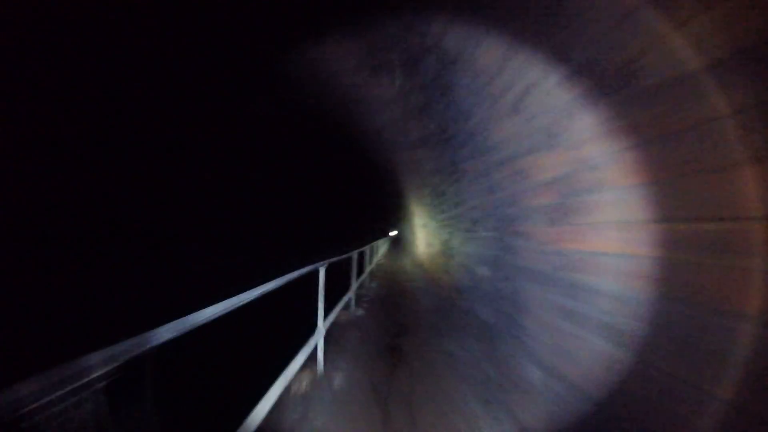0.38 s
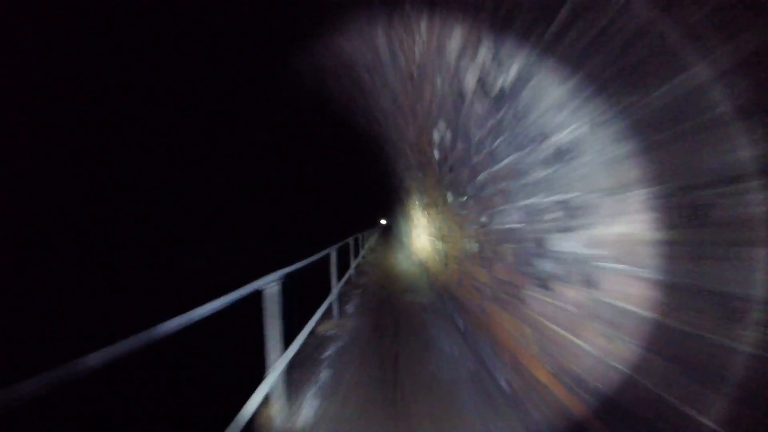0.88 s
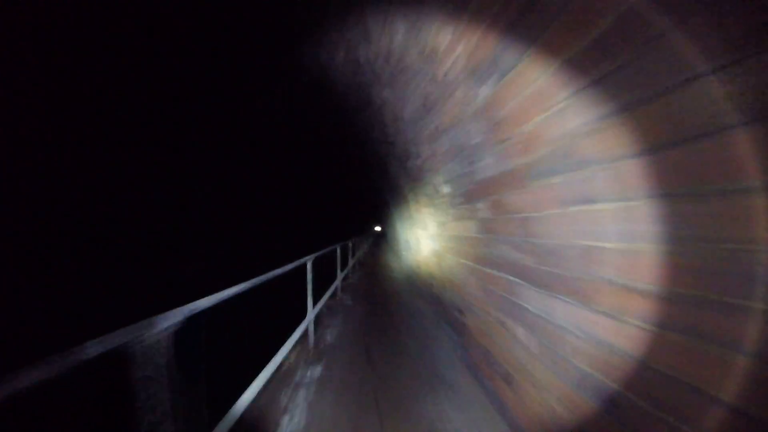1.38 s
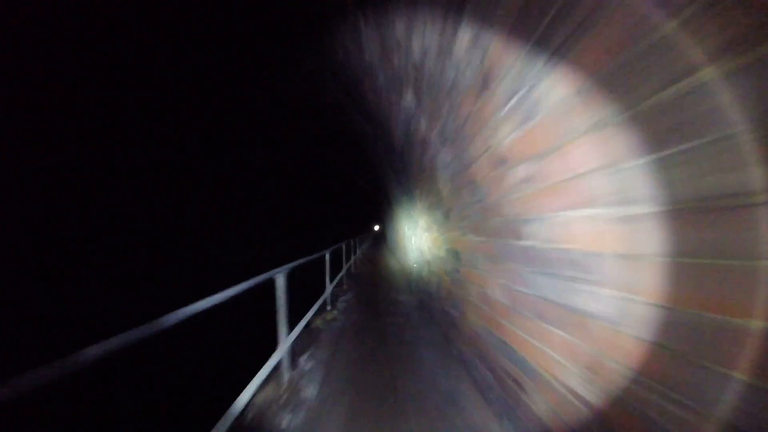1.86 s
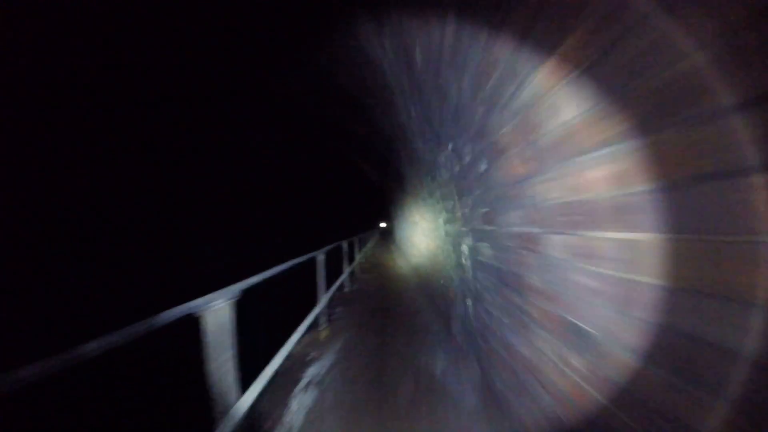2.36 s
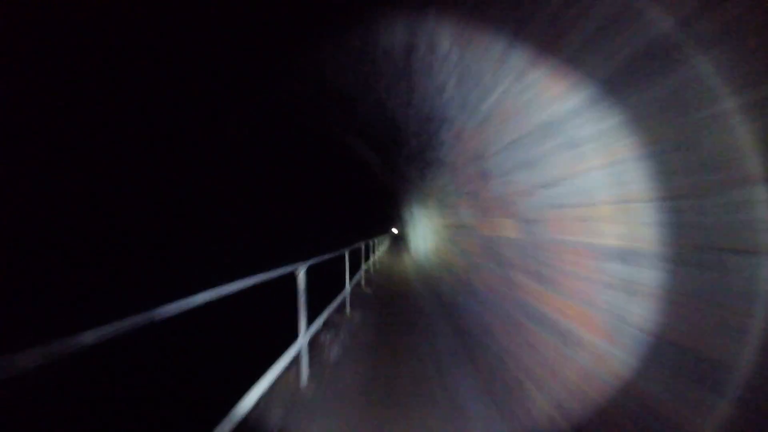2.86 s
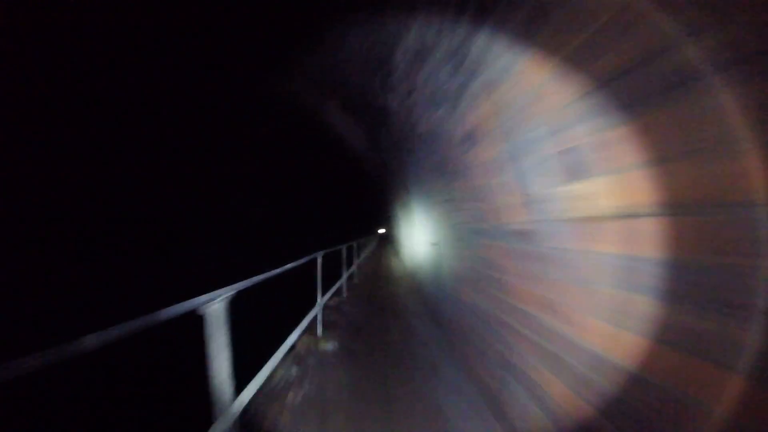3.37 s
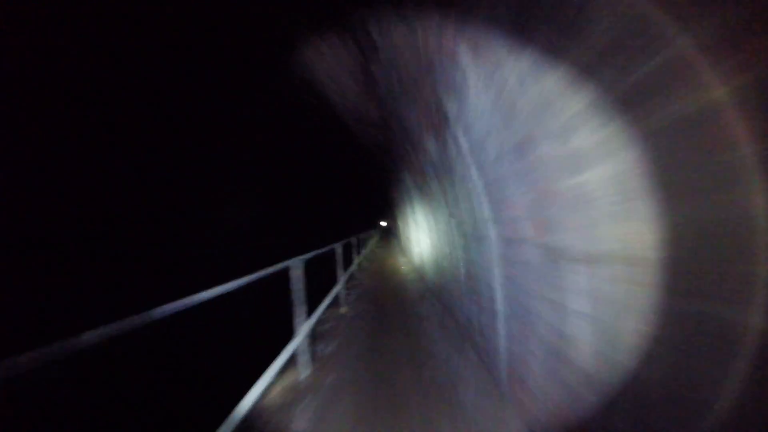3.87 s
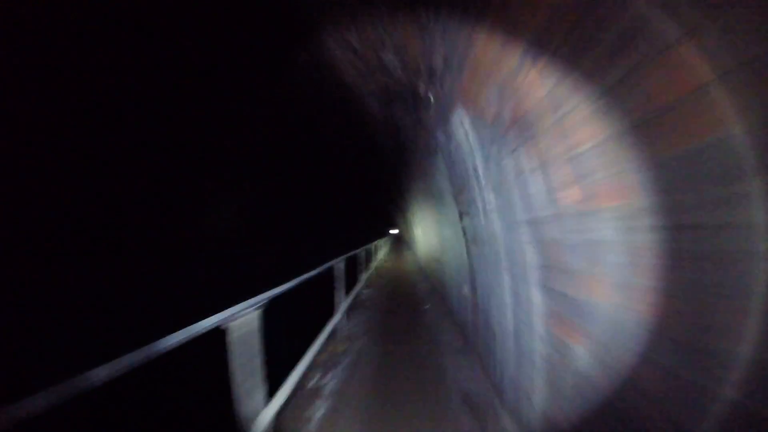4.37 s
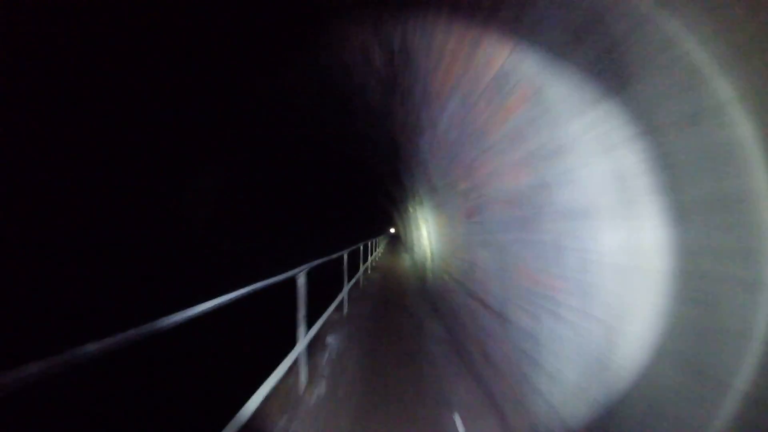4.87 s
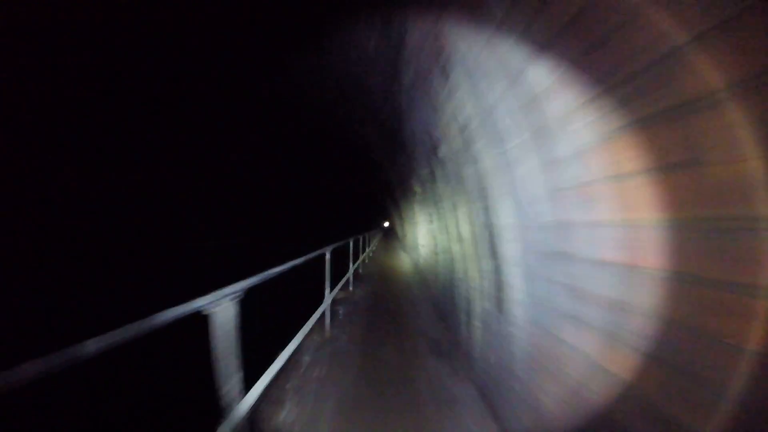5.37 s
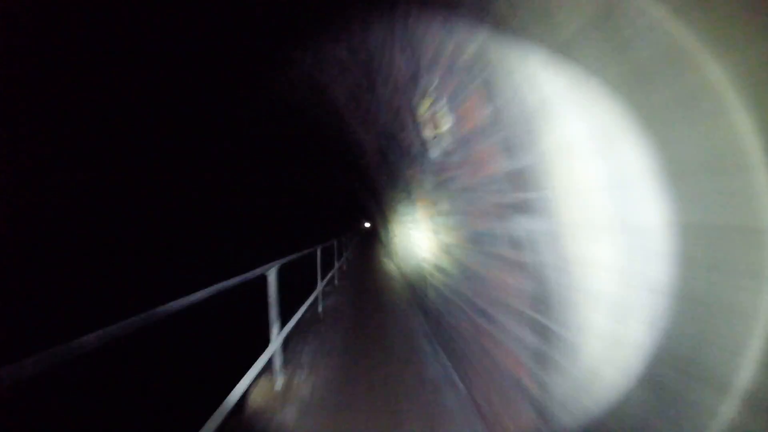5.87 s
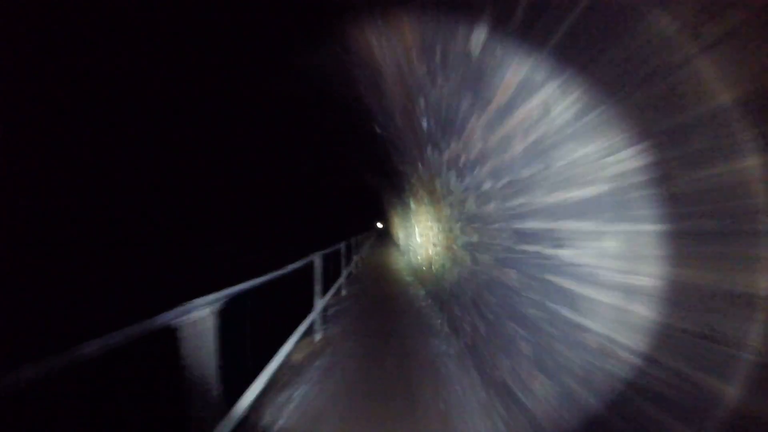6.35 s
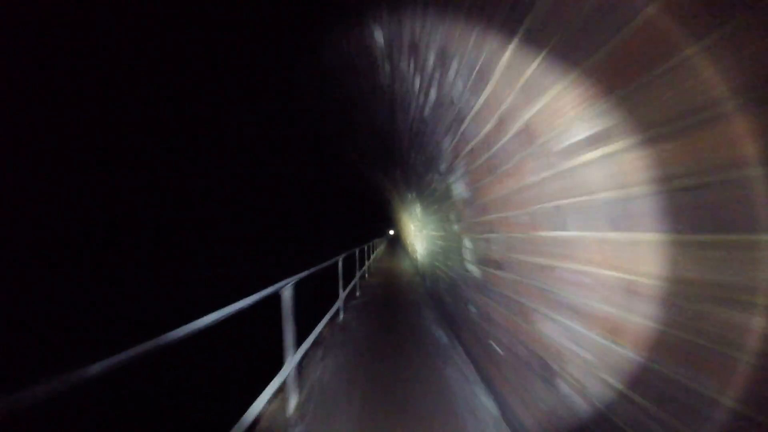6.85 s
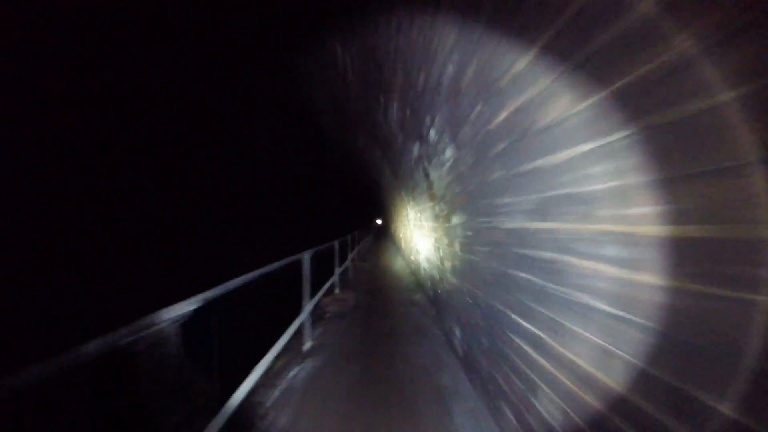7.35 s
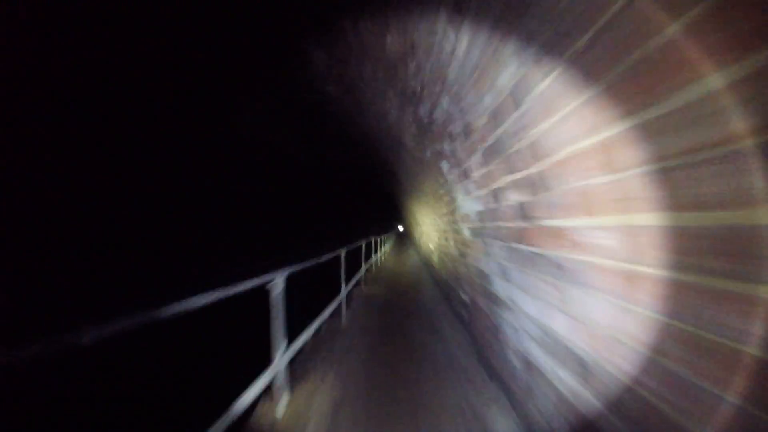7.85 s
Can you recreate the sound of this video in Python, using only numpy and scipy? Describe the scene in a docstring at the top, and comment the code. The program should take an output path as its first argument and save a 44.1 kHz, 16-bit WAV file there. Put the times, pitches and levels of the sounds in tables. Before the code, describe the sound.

A bicycle rolls fast along a rough tunnel path, its frame booming deeply, air buffeting the mounted microphone, loose parts knocking and a faint chain whirr.

```python
"""A bicycle's frame and microphone mount boom near 100 Hz on a rough path: coloured noise, an unsteady
hum and a short decaying sine at every bump. Air buffets the microphone as gusts of low noise.
Loose parts knock as short ringing modes, and the tyres rumble as flickering filtered noise.
The chain whirrs in bursts of resonant noise, and now and then the signal snaps by a sudden step."""
import sys
import numpy as np
from scipy import signal
from scipy.fft import rfft, irfft, next_fast_len
from scipy.io import wavfile
from scipy.ndimage import map_coordinates

SR = 44100
rng = np.random.default_rng(int(sys.argv[2]) if len(sys.argv) > 2 else 0)


def linear_from_db(decibels):
    """Turn decibels (scalar or array-like) into linear amplitude factors; 0 gives 1."""
    return 10 ** (np.asarray(decibels, float) / 20)


def dump_mix(stems):
    """Bounce the given channels to the path in sys.argv[1] as a 16-bit WAV at rate SR."""
    frames = np.atleast_2d(stems).T  # one column per channel
    limited = np.clip(frames, -1, 1)  # hard clip at full scale
    pcm = np.round(limited * 32767).astype(np.int16)
    wavfile.write(sys.argv[1], SR, pcm)


N = 362943

# the path surface: t/s, unevenness as relative frame boom level/dB, grit as relative tyre rumble level/dB
PATH = [(0.0, -23.5, -46.5), (0.48, -22.5, -47.5), (0.92, -27, -48), (1.28, -25, -43), (2.34, -23.5, -43),
        (2.96, -26, -47), (3.37, -26, -45.5), (4.06, -25, -43.5), (4.24, -22, -44), (4.47, -26, -42.5),
        (5.27, -23.5, -41.5), (5.71, -29, -45), (6.53, -23, -43), (7.08, -23, -42.5), (7.47, -28.5, -45),
        (8.23, -24, -48)]


def unit(x):
    """x at rms 1."""
    return x / np.sqrt(np.mean(x ** 2) + 1e-20)


def curves(rows):
    """One value per sample for each column after the time."""
    s, *cols = np.transpose(rows)
    return [np.interp(np.arange(N) / SR, s, c) for c in cols]


def wobble(rate):
    """A smooth random curve, rate knots a second."""
    knots = rng.standard_normal(int(N * rate / SR) + 4)
    return map_coordinates(knots, [np.arange(N) * rate / SR])


def swells(rows, half_s):
    """A bell-shaped change in dB for each (s, dB) row, down to 1/e at half_s from its middle."""
    t = np.arange(N) / SR
    return sum(db * np.exp(-((t - s) / half_s) ** 2) for s, db in rows)


def filtered(x, response):
    """x times a complex response of frequency."""
    m = next_fast_len(N + SR // 2)
    return irfft(rfft(x, m) * response(np.fft.rfftfreq(m, 1 / SR)), m)[:N]


def resonance(f, centre, width):
    """Response at f of two equal band-pass resonators in series, all in Hz."""
    return (1j * f * width / (centre ** 2 - f * f + 1j * f * width)) ** 2


def coloured(x, spectrum):
    """x with the colour of (Hz, dB) points, at rms 1."""
    hz, db = np.transpose(spectrum)
    return unit(filtered(x, lambda f: linear_from_db(np.interp(np.log(f + 1), np.log(hz + 1), db))))


def gritty(grit_db, rate):
    """White noise whose level flickers: dense uneven contacts."""
    return linear_from_db(grit_db * wobble(rate)) * rng.standard_normal(N)


def steadied(x, share):
    """x with part of its own random swelling taken out."""
    envelope = np.abs(signal.hilbert(x, next_fast_len(N))[:N])
    return unit(x / (envelope + 0.79) ** share)


def add(track, s, sound):
    """Mixes a short sound in at a time."""
    part = track[round(s * SR):][:len(sound)]
    part += sound[:len(part)]


def snaps():
    """A jump within one sample sinks back in a few milliseconds, then is smoothed; faint ones are random."""
    # sudden steps of the signal: t/s, signed height before smoothing
    steps = [(.255, .004), (0.4792, .016), (2.0475, -.03), (2.391, .006), (2.3994, .09), (2.9434, .15),
             (3.006, .012), (3.382, .01), (5.4394, 0.19), (5.4798, 0.02), (5.553, .012), (6.6234, .045),
             (7.2954, -.14), (7.3279, 0.026), (7.34, .004), (7.672, .008), (7.6794, .07), (7.703, .01),
             (7.872, .004), (8.159, 0.008)]
    faint_count, faint_height = 40, .002  # mean height
    out = np.zeros(N)
    t = np.arange(SR // 20) / SR
    when, size, sign = rng.random((faint_count, 3)).T
    faint_heights = -faint_height * np.log(1 - size) * np.sign(sign - .5)
    faint = np.c_[when * (N / SR - .1), faint_heights]
    for s, height in np.r_[steps, faint]:
        add(out, s, height * np.exp(-t / .004))
    return filtered(out, lambda hz: 1 / (1 + 1j * hz / 9000) ** 2 / np.sqrt(1 + (hz / 11500) ** 8))


def effort():
    """Whirr gain: each stroke takes the load fast, sags and lets go, over the free-running chain."""
    # pedal strokes load the chain: start t/s, length/s, relative whirr level/dB
    strokes = [(1.291, 0.27, -56.5), (1.716, 0.29, -58.5), (2.102, .295, -61), (2.633, 0.16, -62.5),
               (2.86, 0.053, -68.5), (2.998, 0.07, -67.5), (3.384, 0.083, -69.5), (3.809, 0.36, -65),
               (4.164, 0.19, -68), (4.565, 0.24, -68), (4.81, 0.5, -65), (5.324, 0.081, -65),
               (5.734, 0.31, -76), (6.111, 0.076, -68), (6.284, 0.35, -74.5), (6.551, 0.41, -67),
               (6.92, .45, -70.5)]
    coast_db, spin_db = -75.5, -70.5  # relative whirr level when coasting, and between strokes
    pedalling_from_s, pedalling_to_s = 1.285, 6.8
    pull_s, slack_s, sag_db_per_s = 0.0088, .035, 12  # taking the load, letting go, fading effort
    t = np.arange(N) / SR
    pedalling = (t > pedalling_from_s) & (t < pedalling_to_s)
    gain = linear_from_db(np.where(pedalling, spin_db, coast_db))
    for s, length, db in strokes:
        since = np.maximum(t - s, 0)
        pull = 1 - np.exp(-since / pull_s)
        release = np.exp(-np.maximum(since - length, 0) / slack_s)
        gain = np.hypot(gain, pull * release * linear_from_db(db - sag_db_per_s * since))
    return gain * linear_from_db(.7 * wobble(12))


def chain():
    """Links and teeth rub into metal resonances that wax and wane, narrow ones most, over a faint hiss."""
    # chain and sprocket resonances: centre f/Hz, width/Hz, relative level/dB
    metal = [(962, 150, 3.5), (1335, 240, -4), (1654, 520, -13), (1990, 150, -6), (2230, 230, -6),
             (2960, 240, -20), (3680, 330, -22), (4850, 400, -18), (5250, 250, -18), (5740, 170, -14),
             (6430, 170, -16), (5960, 4900, -21), (8800, 1200, -34.5)]
    # colour of the hiss: f/Hz, level/dB
    hiss_colour = [(1500, -29), (2500, -6.5), (4000, -10), (6000, -7), (6450, 0), (6900, -8), (8600, -10.5),
                   (10300, -22), (13000, -48.5), (16000, -120)]
    flicker_db, wane_db, wane_rate = 1.2, 2.8, 18  # rate in knots a second
    whirr = np.zeros(N)
    for centre, width, db in metal:
        wane = wane_db * min(1, (250 / width) ** .5) * wobble(wane_rate)
        rubbing = gritty(flicker_db, rate=160)
        whirr += linear_from_db(db + wane) * filtered(rubbing, lambda f: resonance(f, centre, width))
    hiss = coloured(gritty(grit_db=2.0, rate=130), hiss_colour)
    hiss_db = -70.5 + 1.1 * wobble(4.1)
    return linear_from_db(8.5) * effort() * unit(whirr) + linear_from_db(hiss_db) * hiss


def tyres():
    """Tread on grit: a lumpy rumble of noise that flickers quickly and follows the path."""
    # colour of the rumble: f/Hz, level/dB
    tyre_colour = [(110, -27), (180, 0.5), (233, -4), (387, -21.5), (446, -13.5), (549, -16), (1050, -26),
                   (1740, -56), (2260, -53), (2640, -77), (4000, -83.5), (5200, -84.5), (8800, -120)]
    rumble_db = curves(PATH)[1] + 1.5 + 1.1 * wobble(13)
    return linear_from_db(rumble_db) * coloured(gritty(grit_db=2.5, rate=90), tyre_colour)


def knocks():
    """Loose parts strike and rebound: casing modes ring under a bright edge and a dull after-rattle."""
    # knocks of loose parts: t/s, relative level/dB, edge level/dB relative to the knock
    strikes = [(0.024, -34, -13), (0.052, -31.5, -19), (0.107, -36.5, -13), (0.177, -32.5, -18),
               (0.235, -32.5, -16.5), (0.288, -37.5, -27), (0.322, -31, -21.5), (0.414, -40, -24),
               (0.459, -36, -20), (0.655, -39, -19), (0.668, -38.5, -22), (0.694, -30.5, -32),
               (0.711, -30.5, -21), (0.747, -25.5, -44), (0.76, -31, -11), (0.82, -32, -19.5),
               (0.891, -37.5, -21), (1.137, -30, -22), (1.216, -27, -21), (1.23, -31.5, -33),
               (1.275, -36, -21), (1.288, -30.5, -20.5), (1.364, -34, -16), (1.384, -32.5, 1.5),
               (1.454, -35.5, -9), (1.472, -34.5, -22), (1.525, -26.5, -27), (1.539, -30.5, -29),
               (1.702, -33.5, -20.5), (1.739, -34.5, -0.5), (1.762, -34.5, -9), (2.467, -31, -28),
               (2.489, -35, -28), (2.784, -32.5, -13), (2.8, -34, -37), (3.048, -29.5, -10),
               (3.193, -37.5, -17), (3.336, -27.5, -14), (3.671, -30.5, -26.5), (3.829, -33.5, -1.5),
               (3.925, -33, -19), (4.155, -33, -24), (4.191, -23.5, -36), (4.207, -30.5, -14.5),
               (4.248, -31, -15), (4.425, -31, -15.5), (4.487, -33, -11), (4.592, -37.5, -4.5),
               (4.604, -36, -24.5), (4.65, -37, -24.5), (5.322, -32, -30), (5.484, -27.5, -21),
               (5.493, -32, -25), (5.556, -32.5, -9), (5.702, -27.5, -27), (5.75, -35, -13),
               (5.889, -34, -19.5), (5.951, -36.5, -10), (6.008, -33, -21.5), (6.051, -30.5, -29),
               (6.065, -27.5, -31), (6.13, -31.5, -39), (6.16, -40, -6), (6.405, -34, -11.5),
               (6.471, -29.5, -25), (7.055, -36.5, -30.5), (7.092, -40, -14), (7.175, -25.5, -17),
               (7.186, -29, -16), (7.352, -27.5, -26.5), (7.413, -30, -11), (7.566, -26, -17),
               (7.59, -36, -25), (7.621, -30, -19), (7.705, -29, -19), (7.713, -31.5, -17),
               (7.724, -34, -12), (7.769, -30, -27), (7.833, -34.5, -32), (7.928, -31, -15),
               (7.938, -35, -11), (7.958, -34.5, -18), (8.0, -38, -27), (8.014, -25, -39),
               (8.075, -34, -28), (8.146, -27, -14), (8.159, -34, -33), (8.218, -26, -11)]
    # modes of the microphone casing: f/Hz, level/dB, t60/s
    casing = [(389, -8, 0.063), (575, -1.5, 0.022), (707, 4, 0.015), (906, 2, 0.018), (1071, -3, 0.029),
              (1490, -20.5, 0.0096)]
    # small random knocks: 60 clumps of 3
    small = rng.random((60, 3, 2))
    clump_s = small[:, :1, 0] * (N / SR - .2) + 0.082 * small[:, :, 1]
    small_db = -49 + 9 * rng.random(clump_s.size)
    extra = np.c_[clump_s.ravel(), small_db, np.full(clump_s.size, -22)]
    # each listed part strikes back once
    rebound_s, rebound_loss_db = .011, 8  # mean flight, mean loss
    flight, loss = rng.random((len(strikes), 2)).T + .5
    rebounds = strikes + np.c_[rebound_s * flight, -rebound_loss_db * loss, 3 * loss]
    rows = np.r_[strikes, rebounds, extra]

    hz, mode_db, t60 = np.transpose(casing)[:, :, None]
    t = np.arange(SR // 20) / SR
    onset = 1 - np.exp(-t / 0.00077)
    body, edges, rattle = np.zeros((3, N))
    for s, db, edge_db in rows:
        # every knock excites and detunes the modes anew
        louder, detune = rng.standard_normal((2, len(casing), 1))
        noise = rng.standard_normal(len(t))
        ring_level = linear_from_db(db - 5.5 + mode_db + 3.3 * louder - 60 * t / t60)
        rings = ring_level * np.sin(2 * np.pi * hz * (1 + 0.049 * detune) * t)
        add(body, s, rings.sum(axis=0) * onset)
        add(edges, s, noise * linear_from_db(db + edge_db - 1.0 - 60 * t / 0.0093))
        add(rattle, s, noise[::-1] * linear_from_db(db - 1.5 - 60 * t / .05))
    bright = filtered(edges, lambda f: resonance(f, 2300, 2800))
    dull = filtered(rattle, lambda f: resonance(f, 750, 900) / (1 + 1j * f / 1400) ** 2)
    return body + bright + dull


def air():
    """Turbulence on the microphone port: low noise in gusts, a little stronger where the path is uneven."""
    # gusts: t/s, level/dB over the steady air stream
    port_gusts = [(.04, 6.5), (.42, 7), (.67, 8.5), (.86, 4), (1.14, 4), (1.5, 6), (2.1, 4.5), (2.33, 7),
                  (2.46, 14.5), (2.66, 7), (2.84, 10.5), (3.0, 2), (3.23, 11.5), (4.0, 10.5), (4.19, 6),
                  (4.89, 13.5), (5.03, 7.5), (5.29, 3.5), (5.48, 3.5), (5.69, 4.5), (5.93, 7.5),
                  (6.11, 4.5), (6.7, 9.5), (6.88, 4.5), (7.16, 11), (7.35, 7.5), (7.6, 9.5), (7.77, 6),
                  (8.0, 5.5), (8.17, 11)]
    # colour of the turbulence: f/Hz, level/dB
    air_colour = [(4.7, -6.5), (8.0, -6), (54, -2), (85, -8), (110, -22), (190, -120)]
    stream_db, gust_s = -25, .04  # steady air stream; half length of a gust
    shake_db = .3 * (curves(PATH)[0] + 24)
    buffet_db = stream_db + shake_db + swells(port_gusts, gust_s) + 1.5 * wobble(3.5)
    turbulence = coloured(rng.standard_normal(N), air_colour)
    return linear_from_db(buffet_db) * steadied(turbulence, share=0.48)


def frame():
    """Road texture keeps the mount humming amid a broad boom; each bump kicks it into a few cycles."""
    # bumps in the path: t/s, level/dB before onset and decay, ring f/Hz
    path_bumps = [(0.219, 2, 96.3), (0.655, -2, 85), (0.997, -4.5, 95.5), (1.12, -1, 97.5),
                  (1.346, -11, 80.7), (1.827, -3, 97.5), (2.067, 2, 104.7), (2.146, 1, 104),
                  (2.229, -7, 98), (2.325, -1, 83), (2.524, 1, 89.3), (2.644, 1.5, 101.5),
                  (2.79, 0.5, 94.7), (2.9, 1, 79), (2.996, 3.5, 101), (3.2, -0.5, 96.3),
                  (3.247, -7.5, 82.6), (4.04, 2.5, 101), (4.214, 4, 98), (4.861, -2, 97.2),
                  (4.984, -2.5, 100), (5.232, -10, 93.5), (5.285, 3, 87.8), (5.466, 0.5, 90.4),
                  (5.654, -1, 81), (5.699, 0.5, 104.3), (5.799, -3.5, 81.4), (5.891, -9.5, 72),
                  (6.673, -0.5, 99), (6.876, 3, 94.4), (7.124, -4.5, 109.4), (7.32, -4, 75.4),
                  (7.696, -5.5, 85.3)]
    # brief dips of the boom: t/s, depth/dB (negative: a rise)
    boom_dips = [(.73, 7.5), (.96, 13), (1.25, 3), (1.72, -4), (2.04, 19), (2.29, 9.5), (2.73, 6),
                 (3.12, 0), (3.33, 1), (5.62, 13.5), (5.76, 6.5), (6.12, 0.5), (6.78, 7.5), (7.47, 6.5)]
    # colour of the broad boom: f/Hz, level/dB
    boom_colour = [(30, -20), (60, -9.5), (85, -1), (101, 4.5), (120, 0), (150, -6.5), (200, -28),
                   (280, -36), (400, -82), (700, -120)]
    dip_s, bump_s, bump_lift_db = 0.025, .05, 2  # half lengths; swell of the boom around every bump
    lifts = [(s + bump_s / 2, bump_lift_db) for s, *_ in path_bumps]
    boom_db = curves(PATH)[0] + 1.9 - swells(boom_dips, dip_s) + swells(lifts, bump_s)
    hum_hz = 101 + 5 * wobble(14)
    hum = np.sqrt(2) * np.sin(2 * np.pi * np.cumsum(hum_hz) / SR)
    boom = steadied(coloured(gritty(grit_db=2.6, rate=23), boom_colour), share=0.46)
    out = linear_from_db(boom_db) * (linear_from_db(-2 + 1.8 * wobble(26)) * hum + linear_from_db(-0.5) * boom)
    t = np.arange(SR // 5) / SR
    onset = 1 - np.exp(-t / 0.013)
    for s, db, hz in path_bumps:
        swing = onset * linear_from_db(db - 60 * t / .12)  # t60 0.12 s
        add(out, s, swing * np.sin(2 * np.pi * (hz * t + rng.random())))
    return out


def housing(sound):
    """The sealed microphone case dulls the treble of sound passing through it."""
    return filtered(sound, lambda hz: 1 / (1 + 1j * hz / 9000) ** 2 / np.sqrt(1 + (hz / 9900) ** 14))


def scene():
    """Tyres, chain and knocks pass through the case; snaps, air and frame boom are added directly."""
    return (snaps() + housing(chain() + tyres() + knocks()) + air() + frame())[None]


def low_pass(x):
    """Removes everything above the highest recorded frequency."""
    return signal.sosfilt(signal.butter(12, 14010, fs=SR, output="sos"), x)


def record(dry):
    """The microphone input saturates softly, rounding off the highest peaks."""
    top = .62  # the ceiling that peaks approach
    mix = dry / (1 + np.abs(dry / top) ** 6) ** (1 / 6)
    return low_pass(mix)


dry = scene()
out = record(dry)
dump_mix(out)
```